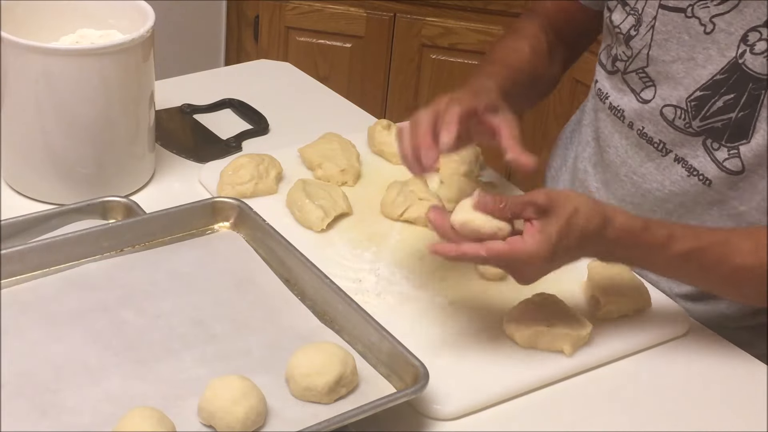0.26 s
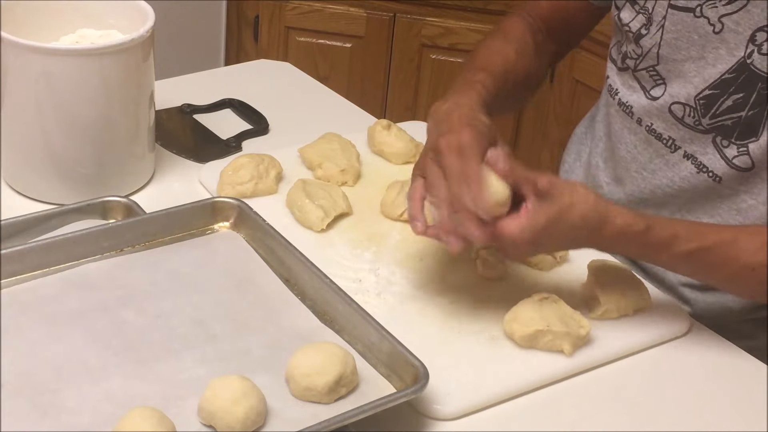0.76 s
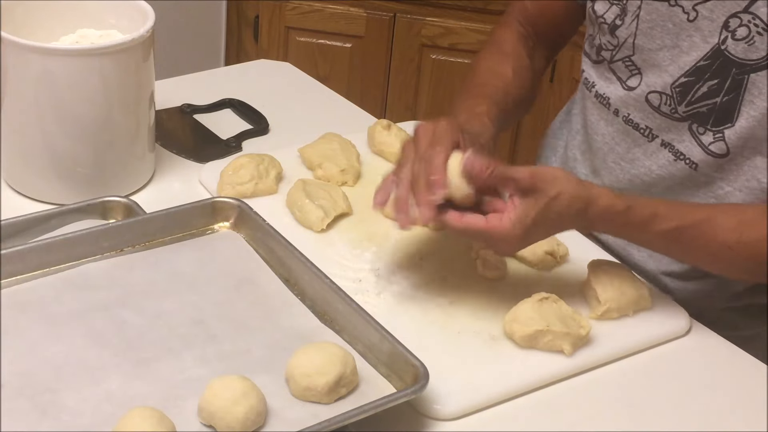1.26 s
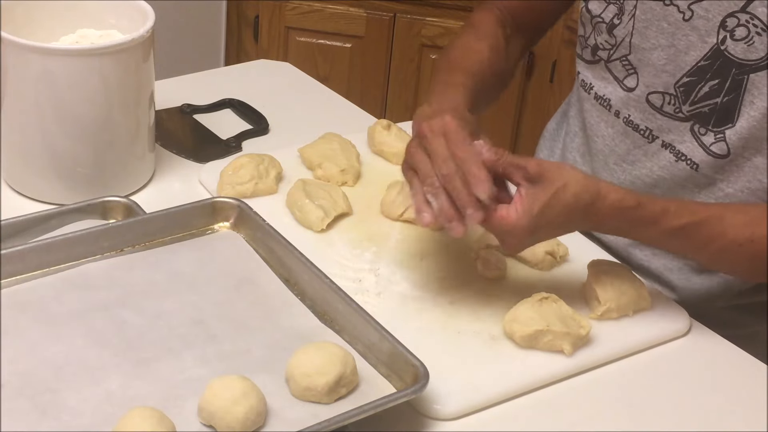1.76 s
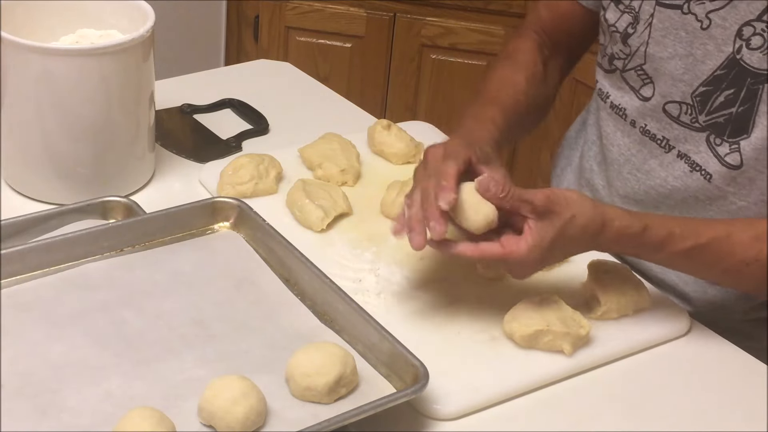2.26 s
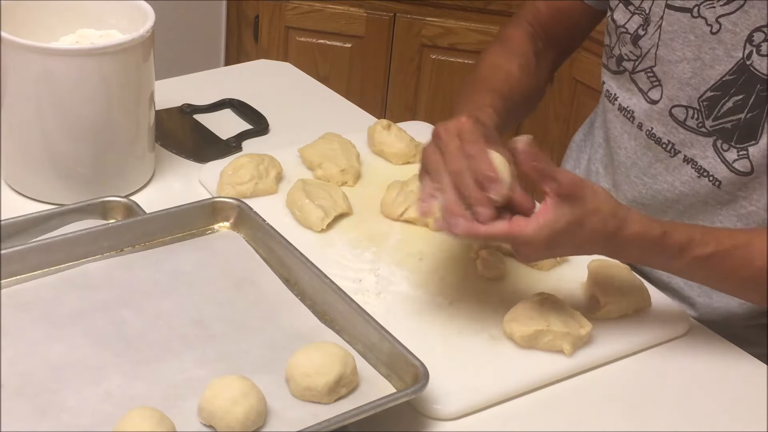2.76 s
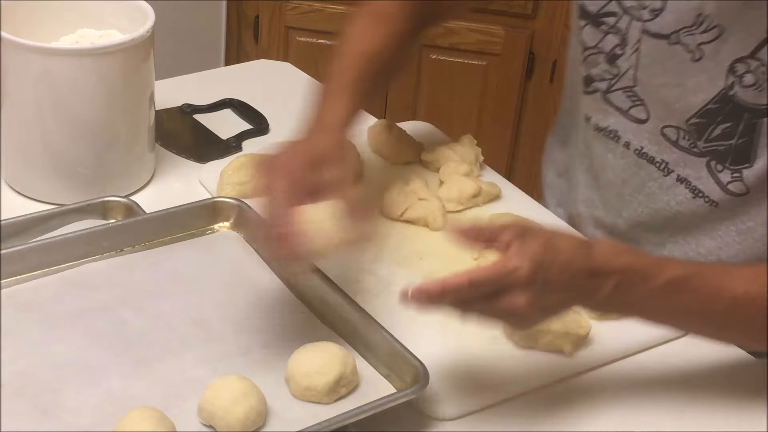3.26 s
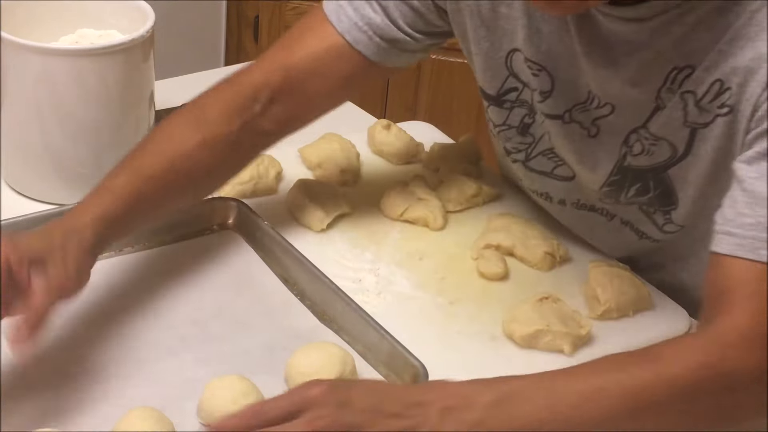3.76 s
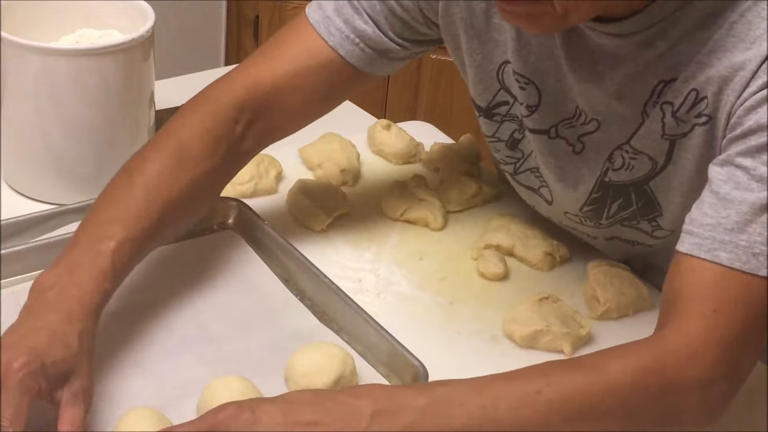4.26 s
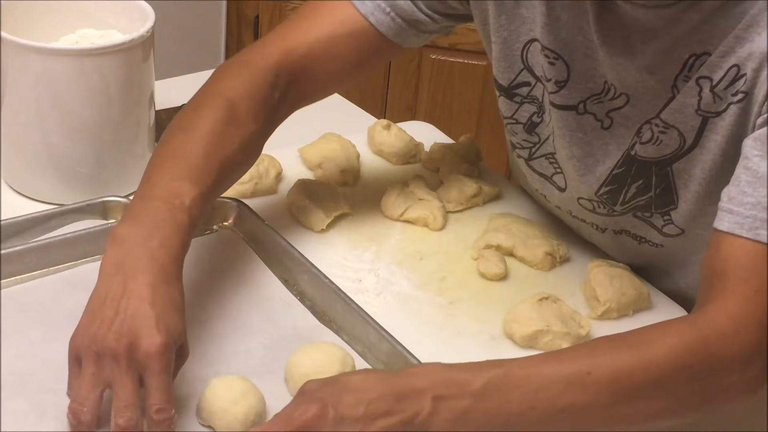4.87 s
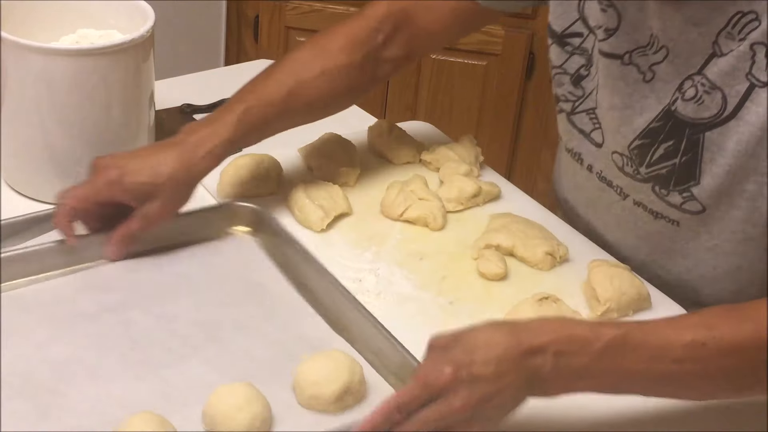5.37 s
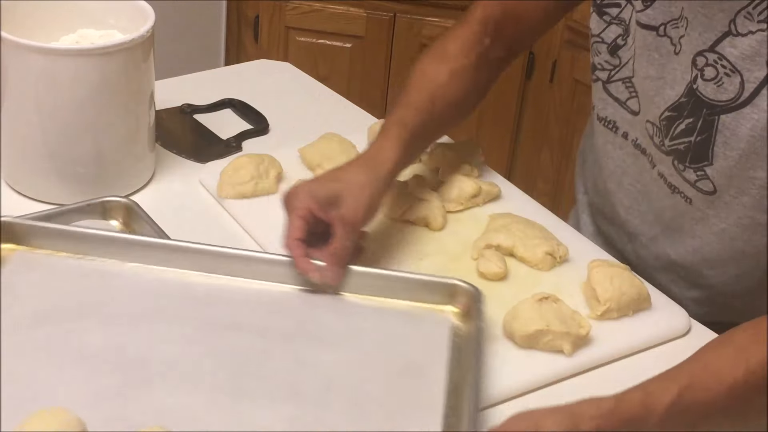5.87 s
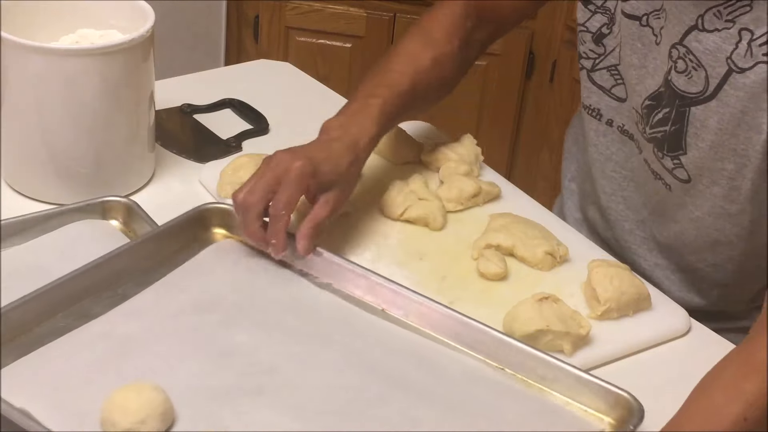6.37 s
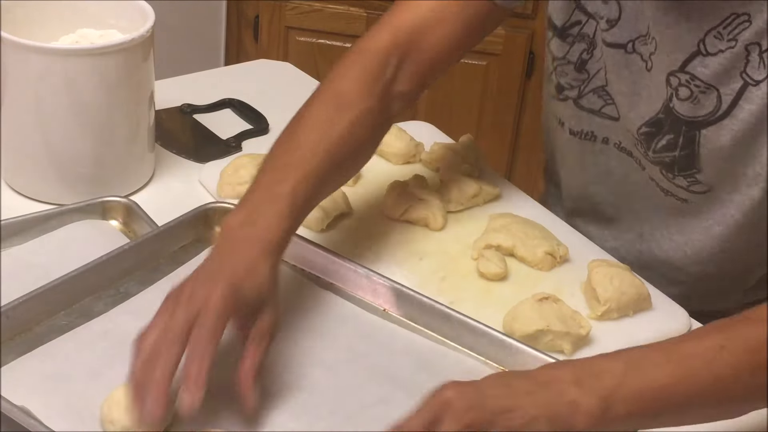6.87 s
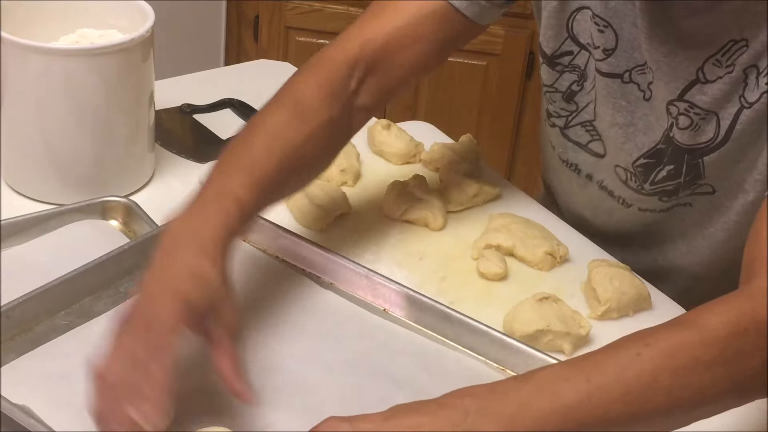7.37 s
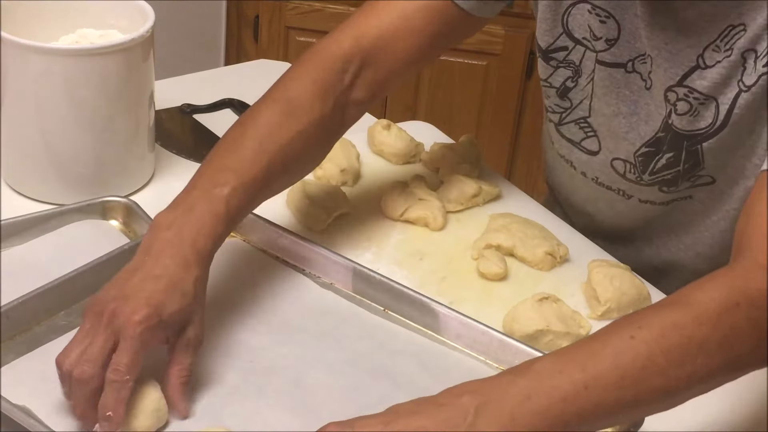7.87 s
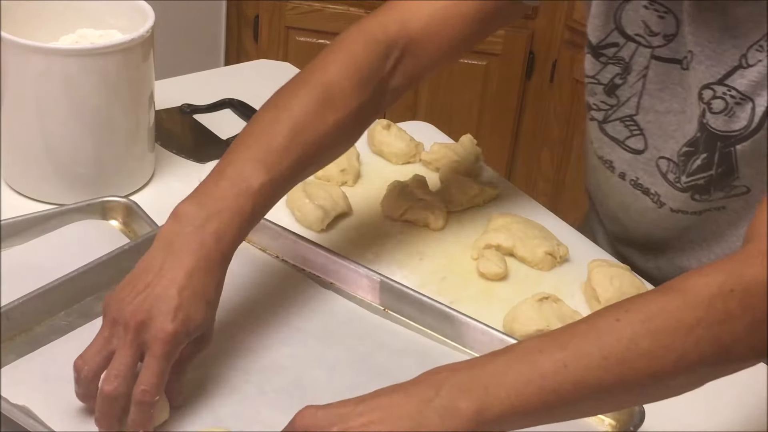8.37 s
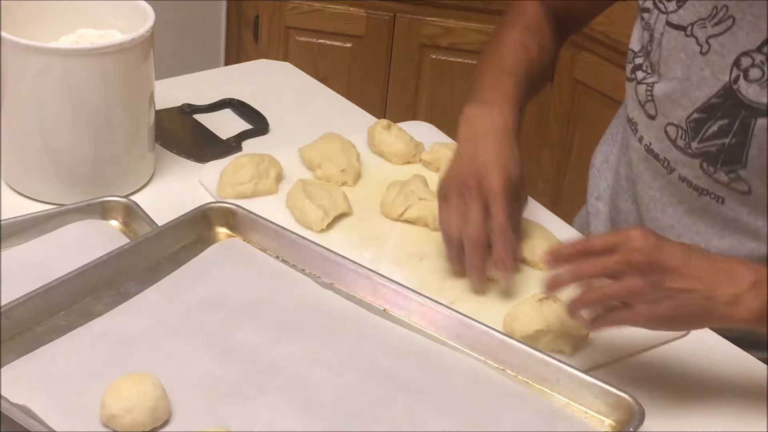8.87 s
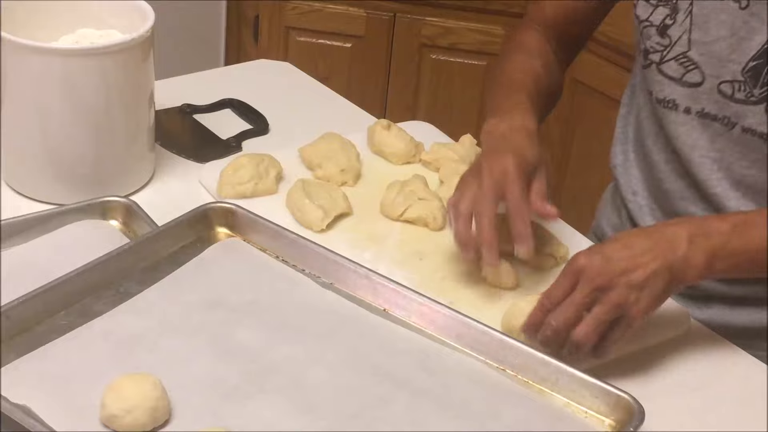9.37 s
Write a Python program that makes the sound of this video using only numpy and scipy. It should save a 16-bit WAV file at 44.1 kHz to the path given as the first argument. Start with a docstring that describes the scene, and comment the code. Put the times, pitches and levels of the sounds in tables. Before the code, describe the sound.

A kitchen appliance hums low and steady throughout, in a small, bright room with a short echo. From about 0.5 to 3.2 seconds, palms roll a ball of dough in faint, quick rubs with tiny sticky ticks. After a soft bump, a metal baking tray slaps down on the counter at 3.7 seconds, the loudest sound, with a deep thud and a brief ring. From 4 to 5.3 seconds fingers lightly rustle and crinkle its paper lining. Between 5.4 and 6.5 seconds the tray is turned in two pushes, making a gritty, grinding metallic scrape with a couple of small bumps. Soft paper rustling and dragging return from about 7 to 8.7 seconds, with a few sharp crinkles. Around 9.3 seconds a hand knocks on a plastic cutting board, among soft counter thuds and a brief rub of dough.

```python
"""A metal baking tray slaps down on a counter and rings, then is turned with a long, grinding scrape.
Before the slap a baker rolls dough between the palms; around the scrape fingers rustle the paper lining.
Rubs and scrapes are dense tiny slips of friction. The counter thuds under soft bumps, and near the end
a hand knocks on a plastic cutting board. A kitchen appliance hums throughout in the small, bright room."""
import sys
import numpy as np
from scipy import signal
from scipy.fft import rfft, irfft
from scipy.io import wavfile
from scipy.ndimage import uniform_filter1d

SR = 44100
rng = np.random.default_rng(int(sys.argv[2]) if len(sys.argv) > 2 else 0)


def file_out(sig):
    """Save sig as 16-bit WAV at sys.argv[1]."""
    # one column per channel
    cols = np.atleast_2d(sig).T
    # limit, then scale
    lim = np.clip(cols, -1, 1)
    pcm = np.round(lim * 32767).astype(np.int16)
    wavfile.write(sys.argv[1], SR, pcm)


N = 424241


def undb(db):
    """Decibels to gain."""
    return 10 ** (np.asarray(db) / 20)


def unit_rms(x):
    """Scale to rms 1."""
    return x / np.sqrt(np.mean(x ** 2))


def seconds(length_s):
    """Time axis of a sound."""
    return np.arange(max(int(length_s * SR), 2)) / SR


def decay(t, t60_s):
    """Exponential decay, 60 dB in t60_s."""
    return np.exp(-np.log(1000) * t / t60_s)


def add(track, time_s, sound):
    """Mix a sound in at a time."""
    i = int(time_s * SR)
    track[i:i + len(sound)] += sound[:N - i]


def on_log_axis(hz, points):
    """Interpolate (frequency [Hz], value) points over log frequency."""
    point_hz, value = np.transpose(points)
    return np.interp(np.log(np.maximum(hz, 1)), np.log(point_hz), value)


def ring(x, response):
    """Convolve with an impulse response scaled to unit energy."""
    return signal.fftconvolve(x, response / np.linalg.norm(response))[:N]


def colour(x, spectrum, size=8192):
    """Minimum-phase filter of the given spectral shape; white noise keeps its level."""
    hz = np.arange(size // 2 + 1) * SR / size
    cepstrum = irfft(np.log(undb(on_log_axis(hz, spectrum))))
    cepstrum[1:size // 2] *= 2
    cepstrum[size // 2 + 1:] = 0
    return ring(x, irfft(np.exp(rfft(cepstrum))))


def whiten(burst):
    """Flatten a burst's spectrum so no pitch booms; taper it to zero and keep its energy."""
    phase = np.angle(rfft(burst, 2 * len(burst)))
    flat = irfft(np.exp(1j * phase))[:len(burst)]
    flat *= np.linspace(1, 0, len(burst)) ** 2
    return flat * np.linalg.norm(burst) / np.linalg.norm(flat)


def modes(table, polarity):
    """Impulse response of a body; polarity -1 alternates the sign of neighbouring modes."""
    t = seconds(1)
    return sum(polarity ** k * undb(db) * decay(t, t60_s) * np.sin(2 * np.pi * hz * t)
               for k, (hz, db, t60_s) in enumerate(table))


def wander(rate_hz):
    """Smooth random drift, rms 1."""
    hold = max(int(SR / rate_hz), 1)
    steps = np.repeat(rng.standard_normal(N // hold + 1), hold)
    return unit_rms(uniform_filter1d(steps, hold)[:N])


def envelope(points):
    """Gain from (time [s], level [dB]) points, silent outside them."""
    time_s, db = np.transpose(points)
    return undb(np.interp(np.arange(N) / SR, time_s, db, left=-np.inf, right=-np.inf))


def friction(slips_per_s, spread_db, judder_db, judder_hz):
    """Dense tiny slips of uneven size, swelling as the contact catches and lets go."""
    slips = (rng.random(N) < slips_per_s / SR) * np.sign(rng.standard_normal(N))
    size_db = spread_db * (2 * rng.random(N) - 1) + judder_db * wander(judder_hz)
    return unit_rms(slips * undb(size_db))


def rubs(strokes, pressure, hiss_spectrum, body_spectrum, slips_per_s, judder_db, skew, crackle_db):
    """Each stroke swells and dies with hand speed; pressure adds a duller body to the hiss."""
    level = np.zeros(N)
    for time_s, length_s, db in strokes:
        swell = np.sin(np.pi * (seconds(length_s) / length_s) ** skew) ** 1.1
        add(level, time_s, undb(db) * unit_rms(swell))
    hiss = level * friction(slips_per_s, spread_db=5, judder_db=judder_db, judder_hz=75)
    body = level * pressure * friction(slips_per_s, spread_db=5, judder_db=judder_db, judder_hz=75)
    # tacky surfaces keep crackling between strokes
    lingering = uniform_filter1d(level, int(0.2 * SR))
    crackle = lingering * friction(slips_per_s=950, spread_db=13, judder_db=0.5, judder_hz=40)
    return colour(hiss + undb(crackle_db) * crackle, hiss_spectrum) + colour(body, body_spectrum)


# mains and motor tones: (frequency [Hz], level [dB])
HUM_TONES = [(59.0, -54.5), (117.9, -53), (177.6, -68), (281, -64), (587.5, -69.5), (706, -66.5),
             (930, -78.5), (990.5, -76), (1119, -84)]
# fan rush and steady hiss: (frequency [Hz], relative level [dB])
FAN_SPECTRUM = [(22, -22), (35, -11.5), (50, 1.5), (70, -4), (100, -4.5), (145, -10), (200, -4.5),
                (245, -8.5), (310, -5.5), (500, -14.5), (750, -15.5), (1100, -21.5), (1600, -31.5),
                (4000, -45.5)]
AIR_SPECTRUM = [(1000, 6.5), (3000, 7.5), (6000, 2.5), (10000, -5), (16000, -7)]


def appliance():
    """Wavering mains and motor hum over a fan's low rush and a faint hiss."""
    hum, t = np.zeros(N), np.arange(N) / SR
    for hz, db in HUM_TONES:
        amplitude = np.sqrt(2) * undb(db + 0.6 * wander(3.8))
        phase = 2 * np.pi * (hz * t + rng.random()) + 0.15 * wander(1.3)
        hum += amplitude * np.sin(phase)
    fan = undb(-52 + 0.87 * wander(4.8)) * colour(rng.standard_normal(N), FAN_SPECTRUM)
    hiss = undb(-74.5) * colour(rng.standard_normal(N), AIR_SPECTRUM)
    return hum + fan + hiss


# room decay: (frequency [Hz], t60 [s])
ROOM_DECAY = [(100, .27), (500, .34), (2000, .36), (6000, .35), (15000, 0.22)]


def room_reverb(x, wet_db, onset_s, late_db, late_t60_s):
    """Walls and cupboards return a diffuse tail, each octave at its own rate; a duller one lingers."""
    t = seconds(0.9)
    spectrum = rfft(rng.standard_normal(len(t)))
    hz = np.arange(len(spectrum)) * SR / len(t)
    octaves_hz = 62.5 * 2 ** np.arange(9)
    tail = np.zeros(len(t))
    for centre_hz in octaves_hz:
        band = on_log_axis(hz, np.c_[octaves_hz, octaves_hz == centre_hz])
        tail += irfft(spectrum * band, len(t)) * decay(t, on_log_axis(centre_hz, ROOM_DECAY))
    lowpass = signal.butter(1, 4000, fs=SR, output="sos")
    late = signal.sosfilt(lowpass, rng.standard_normal(len(t))) * decay(t, late_t60_s)
    response = (tail + undb(late_db) * late) * (1 - np.exp(-t / onset_s))
    return x + undb(wet_db) * ring(x, response)


# reflections off counter, tray and cupboard doors: (delay [s], level [dB])
EARLY_ECHOES = [(.0011, -29), (.0029, -16), (.0047, -13.5)]


def early_echoes(x):
    """Close reflections comb the middle and treble."""
    echoes = np.zeros(N)
    for delay_s, db in EARLY_ECHOES:
        add(echoes, delay_s, undb(db) * x)
    return x + signal.sosfilt(signal.butter(2, 1300, "high", fs=SR, output="sos"), echoes)


# skin rubbing over dough: (time [s], length [s], level [dB])
PALM_STROKES = [(.46, 0.12, -73.5), (0.668, 0.065, -65), (0.853, .12, -66.5), (1.05, 0.099, -73),
                (1.217, 0.14, -64), (1.35, 0.085, -69), (1.51, .04, -66.5), (1.569, 0.052, -63),
                (1.665, 0.051, -60.5), (1.84, 0.13, -67.5), (1.99, .05, -67), (2.145, 0.15, -68.5),
                (2.309, 0.048, -62), (2.48, 0.12, -67), (2.798, 0.068, -66), (2.953, 0.046, -64),
                (3.095, 0.13, -59), (8.94, 0.16, -71), (9.252, 0.12, -56)]
# hiss and body of rubbed skin: (frequency [Hz], relative level [dB])
SKIN_HISS_SPECTRUM = [(1200, -8), (3000, -5), (6000, 1), (10000, 0), (13000, -0.5), (16000, -2)]
SKIN_BODY_SPECTRUM = [(500, -2.5), (1400, 2), (2500, 0), (4000, 2.5), (8000, -30)]


def dough_rolling():
    """Palms slip over the tacky dough ball at constant pressure."""
    return rubs(PALM_STROKES, undb(-6.5), SKIN_HISS_SPECTRUM, SKIN_BODY_SPECTRUM,
                slips_per_s=2000, judder_db=2.5, skew=0.55, crackle_db=-8)


# drags over the paper; the first row is a brief hiss as the tray's ring fades: (time [s], length [s], level
# [dB])
PAPER_STROKES = [(4.03, .06, -54), (4.15, 0.092, -57.5), (4.4, 0.052, -58), (4.53, 0.1, -64),
                 (4.79, .11, -58.5), (4.91, 0.18, -65.5), (5.33, 0.07, -53.5), (6.615, .06, -59),
                 (7.055, 0.051, -56.5), (7.14, 0.16, -55), (7.31, 0.092, -57.5), (7.65, 0.062, -61),
                 (7.72, 0.1, -54), (7.83, .09, -57.5), (7.94, 0.077, -56), (8.04, 0.14, -54.5),
                 (8.265, 0.098, -57), (8.34, .12, -54.5), (8.505, 0.054, -52), (8.575, 0.096, -60.5),
                 (8.67, 0.053, -53.5)]
# hand pressure, greatest while the dough is dragged: (time [s], body re hiss [dB])
HAND_PRESSURE = [(4, -6), (6.6, -11), (7.22, 0), (7.36, -5.5), (7.72, 2), (8.13, 5), (8.28, -7.5),
                 (8.75, -2)]
# hiss and body of the paper: (frequency [Hz], relative level [dB])
PAPER_HISS_SPECTRUM = [(1180, -48), (2000, -5), (2760, -5.5), (3060, -4.5), (3940, -3.5), (4820, -3.5),
                       (6880, 1), (10400, -2.5), (13800, -2), (16000, -9)]
PAPER_BODY_SPECTRUM = [(400, -2.5), (750, -3.5), (980, 9), (1400, 0.5), (2000, -6.5), (4000, -16),
                       (8000, -26)]


def paper_rustle():
    """Fingers and dough drag over the baking paper with changing pressure."""
    return rubs(PAPER_STROKES, envelope(HAND_PRESSURE), PAPER_HISS_SPECTRUM, PAPER_BODY_SPECTRUM,
                slips_per_s=4200, judder_db=3, skew=0.69, crackle_db=-6.5)


# sharp paper crinkles: (time [s], level [dB])
CRINKLES = [(3.677, -49), (4.056, -43), (4.806, -37.5), (4.877, -47.5), (5.333, -36.5), (7.256, -37.5),
            (7.617, -55.5), (7.892, -43), (8.69, -45), (9.340, -43.5)]


def snaps(decay_s, unstick_delay_s):
    """Tiny noise bursts: paper crinkles, and dough unsticks from the skin early in each palm stroke."""
    bursts, t = np.zeros(N), seconds(0.03)
    unsticking = [(time_s + unstick_delay_s, db + 4 + 3 * rng.uniform(-1.1, 1))
                  for time_s, _, db in PALM_STROKES]
    for time_s, db in CRINKLES + unsticking:
        add(bursts, time_s, undb(db) * np.exp(-t / decay_s) * rng.standard_normal(len(t)))
    return colour(bursts, PAPER_HISS_SPECTRUM)


# soft, heavy bumps on the counter: (time [s], level [dB], frequency [Hz])
COUNTER_BUMPS = [(3.369, -32.5, 91), (3.703, -15, 145), (3.710, -26.5, 244), (3.723, -14, 79.4),
                 (3.754, -21.5, 105), (5.331, -36.5, 161), (5.334, -35.5, 90.3), (5.447, -39, 126),
                 (6.240, -45.5, 204), (6.245, -39, 330), (9.018, -41, 121.5), (9.391, -38, 84)]


def counter_thuds(rise_s, t60_s):
    """The counter top swings briefly under each bump."""
    out, t = np.zeros(N), seconds(0.5)
    swing = (1 - np.exp(-t / rise_s)) * decay(t, t60_s)
    for time_s, db, hz in COUNTER_BUMPS:
        add(out, time_s, undb(db) * swing * np.sin(2 * np.pi * hz * t))
    return out


# knocks on the board: (time [s], level [dB], contact decay [s], relative click level [dB])
BOARD_KNOCKS = [(9.3214, -29.5, .00018, -5.5), (9.33, -31.5, 0.00062, -30), (9.3414, -33, 0.0004, -10)]
# board resonances: (frequency [Hz], level [dB], t60 [s])
BOARD_MODES = [(244, -20.5, 0.12), (320, 6, 0.17), (398, -5, 0.11), (563, 7, 0.037), (770, 8.5, 0.04),
               (890, 15, 0.011), (1113, -26, 0.03), (1880, -14, .04)]
# contact click: (frequency [Hz], relative level [dB])
CLICK_SPECTRUM = [(600, 0), (1500, 7), (2600, -7), (4000, 1), (6500, -11), (9000, -18), (16000, -16)]


def board_knocks(click_decay_s):
    """The cutting board taps the counter; a softer contact pushes longer and favours the low modes."""
    force, click, t = np.zeros(N), np.zeros(N), seconds(0.03)
    for time_s, db, contact_s, click_db in BOARD_KNOCKS:
        push = np.exp(-t / contact_s)
        add(force, time_s, undb(db) * push / np.linalg.norm(push))
        burst = np.exp(-t / click_decay_s) * rng.standard_normal(len(t))
        add(click, time_s, undb(db + click_db) * burst)
    body = ring(force, modes(BOARD_MODES, polarity=1))
    return undb(12) * body + colour(click, CLICK_SPECTRUM)


# rim judder, and last a brief bright clack of the tray: (time [s], length [s], centre [Hz], bandwidth [Hz],
# level [dB])
RIM_CATCHES = [(5.427, 0.023, 1700, 1400, -48), (5.481, 0.13, 935, 256, -38),
               (5.497, 0.066, 3990, 120, -39.5), (5.525, 0.19, 626, 110, -43.5),
               (5.862, 0.047, 1600, 453, -41.5), (5.944, 0.32, 970, 200, -44),
               (6.135, 0.057, 463, 129, -40.5), (6.311, 0.058, 2260, 600, -44),
               (6.349, 0.0027, 2410, 2000, -37.5)]


def rim_catches(spread_db):
    """Where the tray's rim sticks, a run of uneven slips drives one broad resonance; the last, very short row
    is a bright clack of the tray."""
    out, t = np.zeros(N), seconds(0.021)
    for time_s, length_s, hz, width_hz, db in RIM_CATCHES:
        grip = np.sin(np.pi * seconds(length_s) / length_s)
        slips = rng.standard_normal(len(grip)) * undb(spread_db * rng.standard_normal(len(grip)))
        resonance = np.exp(-np.pi * width_hz * t) * np.sin(2 * np.pi * hz * t)
        add(out, time_s, undb(db) * unit_rms(np.convolve(grip * slips, resonance)))
    return out


# strong tray resonances: (frequency [Hz], level [dB], t60 [s])
TRAY_MODES = [(340, -9, .28), (394, -7, .2), (427, -6, .2), (447, -1, .26), (463, -3, .24), (524, -6, .2),
              (543, -1, .29), (574, 0, .29), (612, -1.5, .31), (762, -6, .24), (787, -3, .27),
              (868, -2, .21), (908, -5, .2), (936, -3, .22), (996, -2, .35), (1043, -8, .36),
              (1100, -8, .22), (1222, -3, .2), (1335, -10, .18), (1495, -8, .17), (1538, -10, .18),
              (1662, -8, .15), (1782, -9, .15), (1925, -12, .17), (2035, -12, .17), (2113, -11, .16),
              (2406, -12, .13), (2610, -13, .13), (3270, -14, .13), (3981, -13, .15)]
# dense weak modes of the metal sheet: (frequency [Hz], relative level [dB])
SHEET_SPECTRUM = [(100, -14), (200, -5), (280, -4), (420, 0.5), (650, -1.5), (1000, 2), (1250, -4.5),
                  (1600, -6), (3000, -16.5), (8000, -29.5)]


def tray_body(force, sheet_db):
    """The tray answers with its strong modes and a dense, paper-damped mass of weak ones."""
    strong = ring(force, modes(TRAY_MODES, polarity=-1))
    return strong + undb(sheet_db) * colour(force, SHEET_SPECTRUM)


# two pushes that turn the tray, each a list of (time [s], grit level [dB], grind level [dB])
TRAY_PUSHES = [
    [(5.41, -62, -69), (5.428, -50, -43), (5.476, -43.5, -49), (5.488, -39, -29.5), (5.518, -44, -33),
     (5.532, -39, -37), (5.678, -47, -38), (5.764, -63.5, -44.5), (5.84, -60, -49)],
    [(5.84, -57, -53), (5.892, -50.5, -43.5), (6.108, -50.5, -48), (6.172, -49, -41), (6.226, -49.5, -50),
     (6.24, -41, -39), (6.36, -39, -59), (6.392, -45, -44), (6.53, -70.5, -68)],
]
# grit under the tray: (frequency [Hz], relative level [dB])
GRIT_SPECTRUM = [(300, -14), (1000, 3), (2200, 2), (3500, -0.5), (4900, -3), (6100, 2.5), (7500, -4.5),
                 (9000, -1.5), (10300, -8), (12500, -3), (16000, -8)]


def tray_scrape():
    """The base grinds over the counter, which rumbles while the tray rings; flour hisses and cracks."""
    grit_level = sum(envelope([(s, db) for s, db, _ in push]) for push in TRAY_PUSHES)
    grind_level = sum(envelope([(s, db) for s, _, db in push]) for push in TRAY_PUSHES)
    grind = grind_level * friction(slips_per_s=2000, spread_db=10.5, judder_db=4, judder_hz=70)
    flour = unit_rms(rng.standard_normal(N) * undb(2.4 * wander(120)))
    cracks = undb(-7) * friction(slips_per_s=260, spread_db=3, judder_db=2.5, judder_hz=30)
    grit = colour(grit_level * (flour + cracks), GRIT_SPECTRUM)
    rumble = colour(grind, [(60, -4), (150, -2), (330, -4), (700, -24), (3000, -55)])
    return undb(-7.5) * tray_body(grind, sheet_db=1.5) + undb(-16) * rumble + undb(1) * grit


# tray striking the counter: (time [s], level [dB], relative clash level [dB])
TRAY_BLOWS = [(3.6975, -10.5, 6), (3.737, -12.5, 4), (5.484, -27, 0), (6.239, -33, 0.5)]
# contacts in a blow (rim, flat, rebound): (delay [s], body level [dB], clash level [dB], decay [s])
BLOW_CONTACTS = [(0, 0.5, -0.5, .004), (0.0134, -2.5, -15.5, .011), (.027, -6.5, -13.5, .009)]
# metallic clash: (frequency [Hz], relative level [dB])
CLASH_SPECTRUM = [(150, -10), (400, 1), (1000, -4), (2100, -2), (3000, -7.5), (4800, -10), (6200, -4.5),
                  (7500, -9), (10500, -11.5), (13000, -12.5), (16000, -16)]


def tray_slaps():
    """At each contact the tray chatters on the counter and rings; hard blows clash more brightly."""
    force, clash, t = np.zeros(N), np.zeros(N), seconds(0.15)
    for time_s, db, bright_db in TRAY_BLOWS:
        for delay_s, body_db, clash_db, decay_s in BLOW_CONTACTS:
            chatter = undb(db) * np.exp(-t / decay_s) * rng.standard_normal((2, len(t)))
            add(force, time_s + delay_s, undb(body_db) * whiten(chatter[0]))
            add(clash, time_s + delay_s, undb(clash_db + bright_db) * whiten(chatter[1]))
    return undb(-1.5) * tray_body(force, sheet_db=-1.5) + colour(clash, CLASH_SPECTRUM)


def scene():
    """Handling sounds in the room, plus dry thuds and hum; both channels alike."""
    dough = undb(-3.5) * dough_rolling()
    paper = undb(-3) * paper_rustle()
    tray = tray_slaps() + tray_scrape() + undb(-5.5) * rim_catches(spread_db=3.5)
    ticks = snaps(decay_s=0.0019, unstick_delay_s=0.007)
    board = board_knocks(click_decay_s=0.00068)
    handling = early_echoes(tray + dough + paper + ticks + board)
    room = room_reverb(handling, wet_db=-6, onset_s=0.0047, late_db=-16.5, late_t60_s=0.9)
    mono = room + counter_thuds(rise_s=0.0068, t60_s=0.24) + appliance()
    return np.array([mono, mono])


def record(dry):
    """Cut the deepest bass, round the peaks, cut the top."""
    highpass = signal.butter(2, 32, "high", fs=SR, output="sos")
    lowpass = signal.ellip(12, 0.2, 90, 15800, fs=SR, output="sos")
    rounded = np.tanh(signal.sosfilt(highpass, dry))
    return signal.sosfilt(lowpass, rounded)


dry = scene()
out = record(dry)
file_out(out)
```